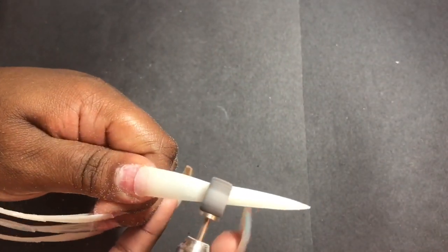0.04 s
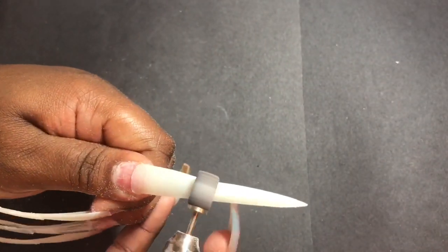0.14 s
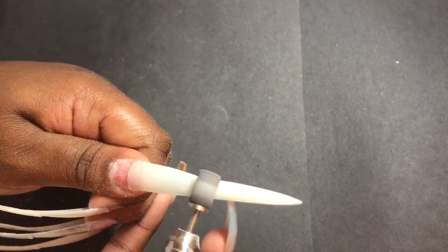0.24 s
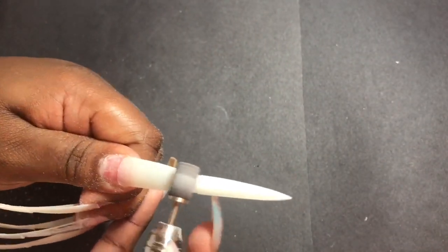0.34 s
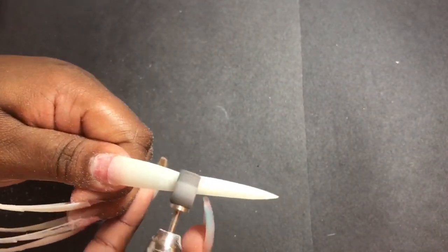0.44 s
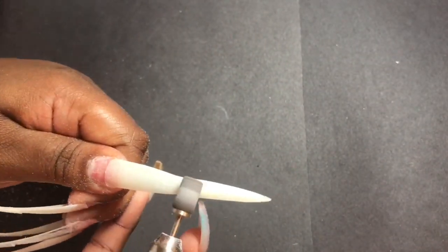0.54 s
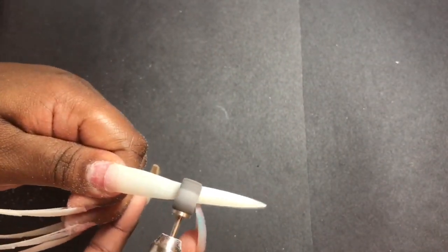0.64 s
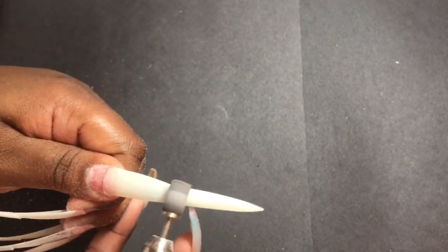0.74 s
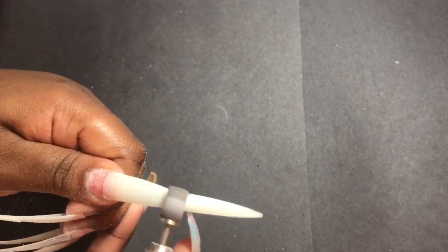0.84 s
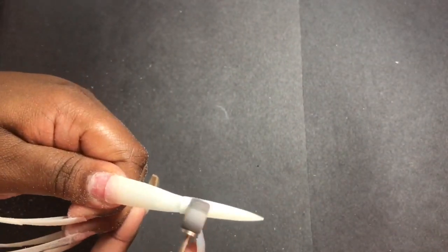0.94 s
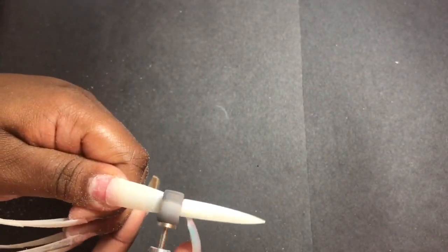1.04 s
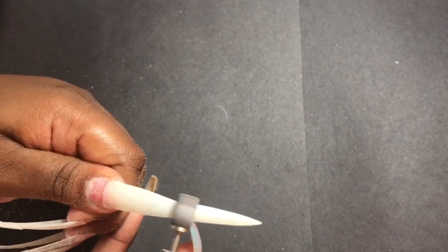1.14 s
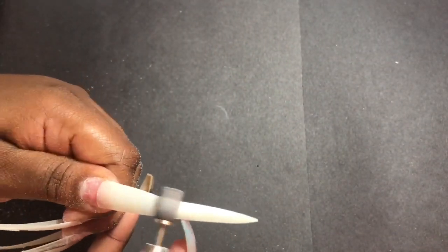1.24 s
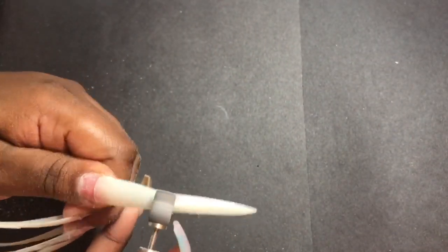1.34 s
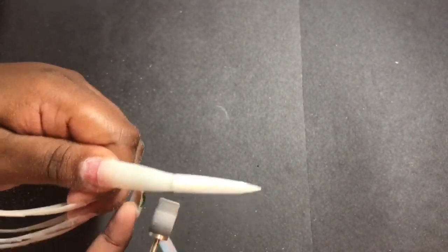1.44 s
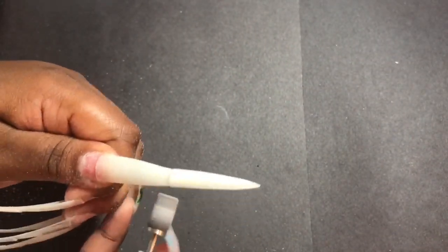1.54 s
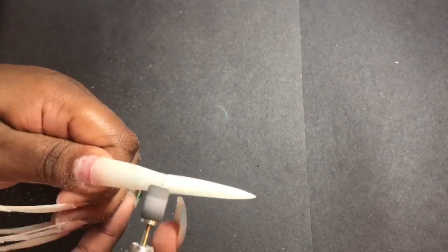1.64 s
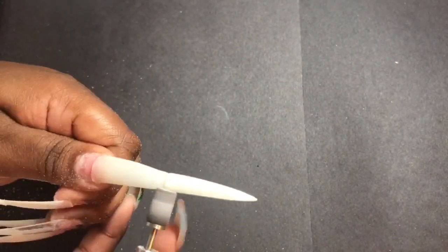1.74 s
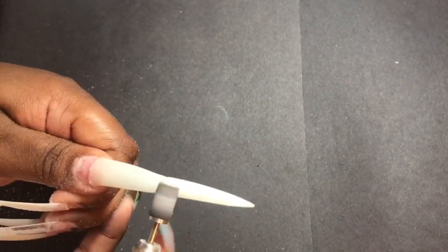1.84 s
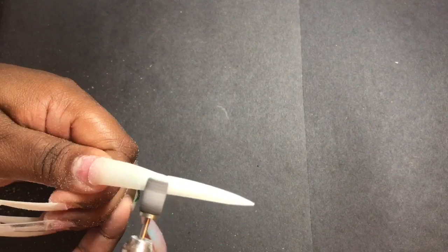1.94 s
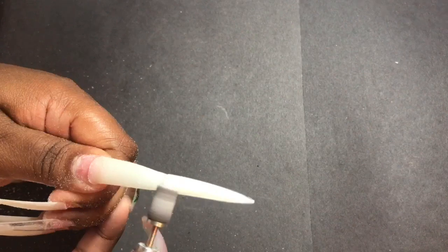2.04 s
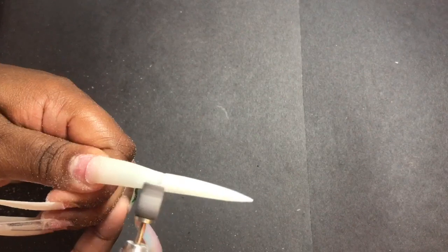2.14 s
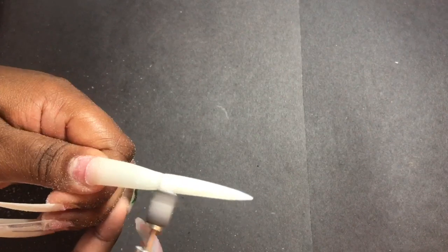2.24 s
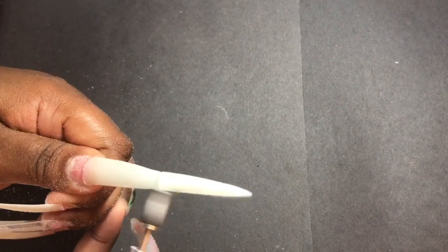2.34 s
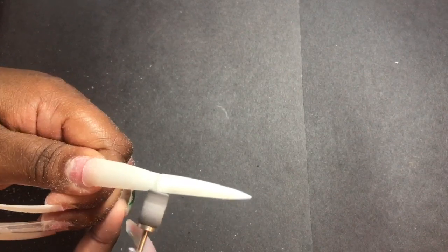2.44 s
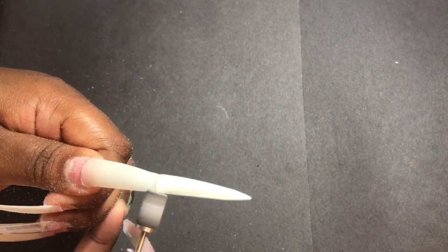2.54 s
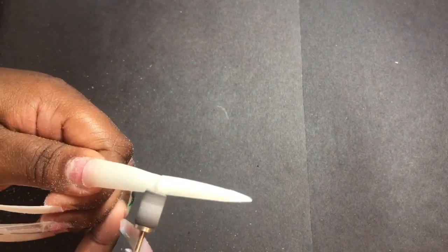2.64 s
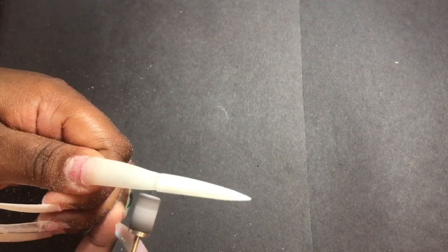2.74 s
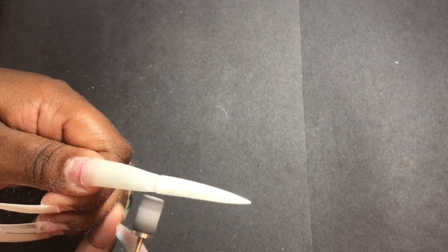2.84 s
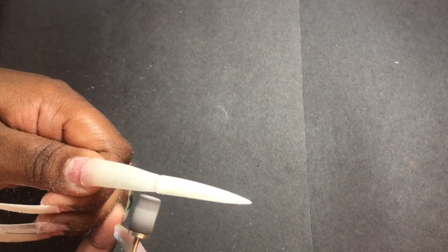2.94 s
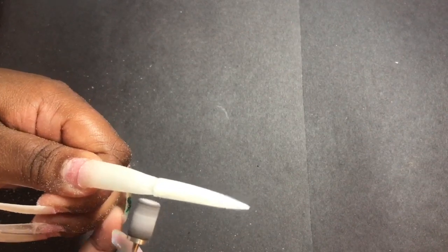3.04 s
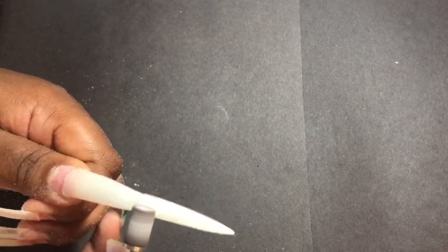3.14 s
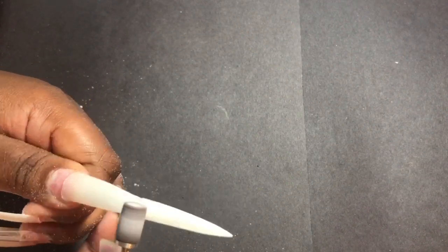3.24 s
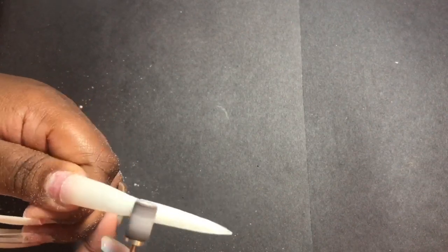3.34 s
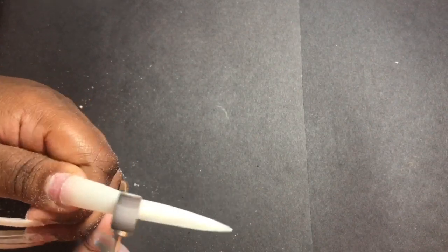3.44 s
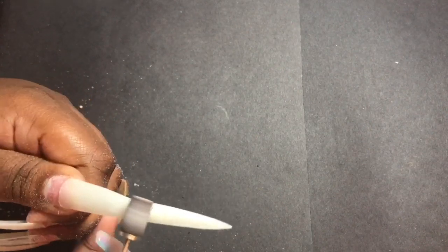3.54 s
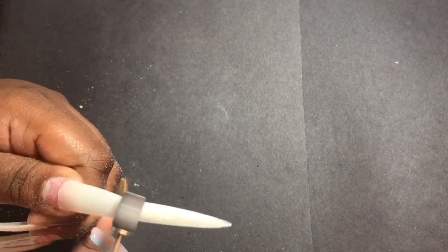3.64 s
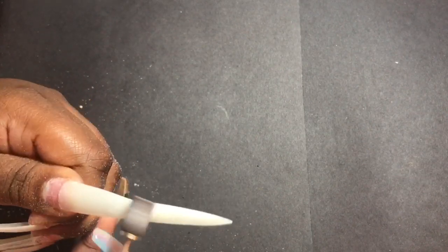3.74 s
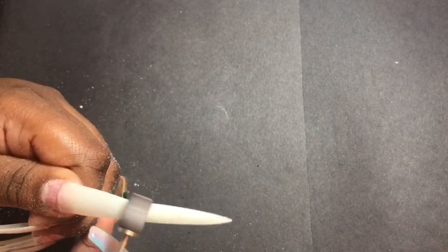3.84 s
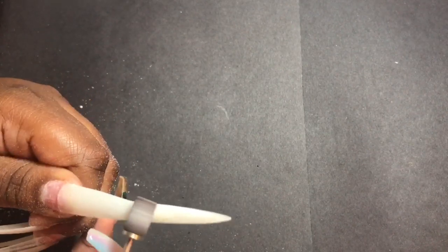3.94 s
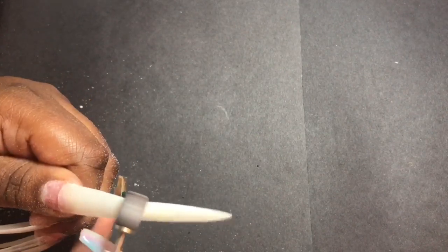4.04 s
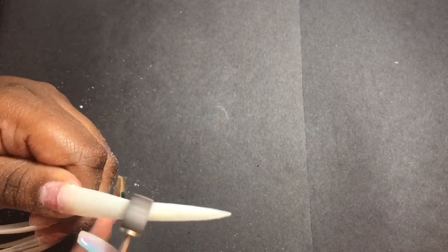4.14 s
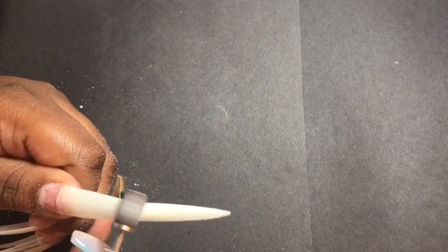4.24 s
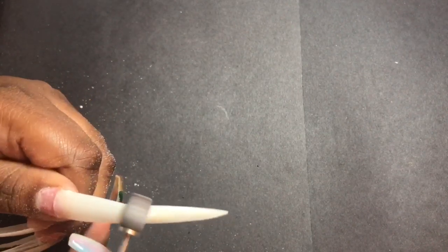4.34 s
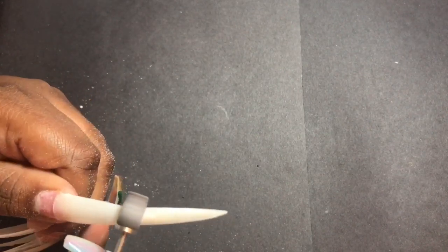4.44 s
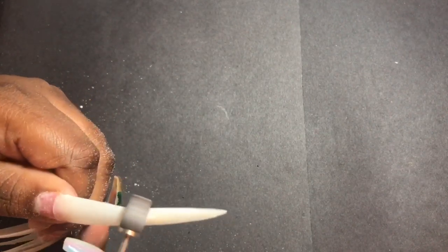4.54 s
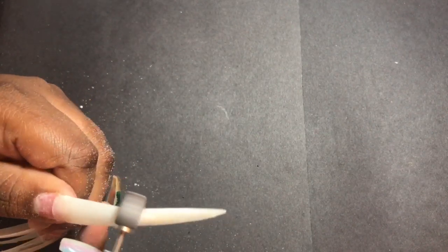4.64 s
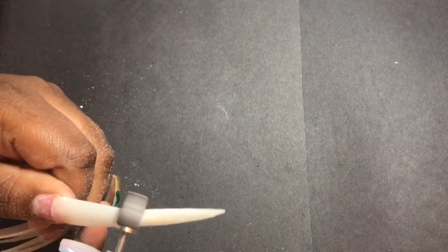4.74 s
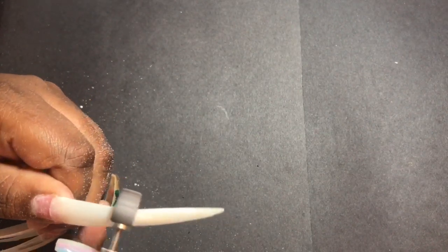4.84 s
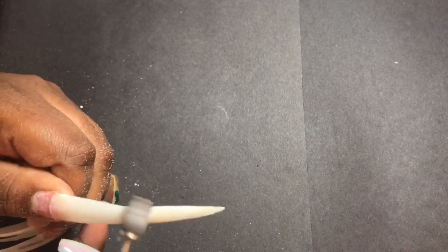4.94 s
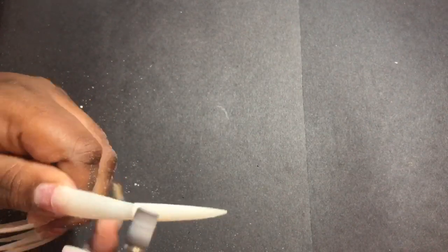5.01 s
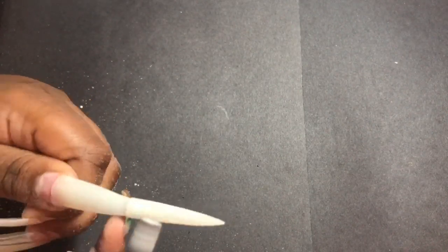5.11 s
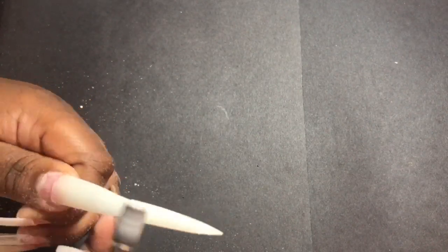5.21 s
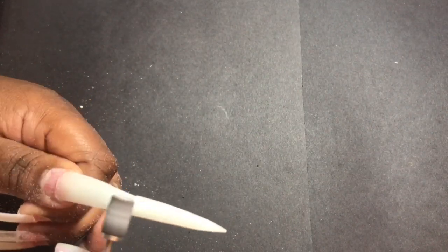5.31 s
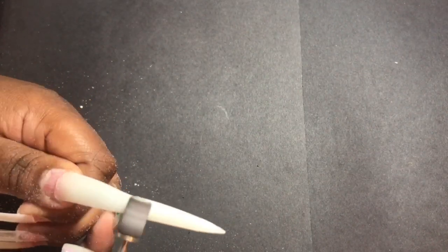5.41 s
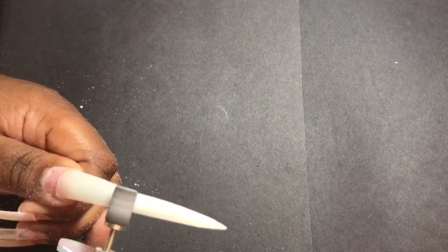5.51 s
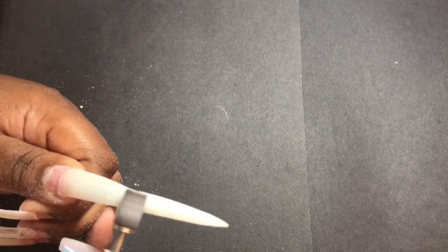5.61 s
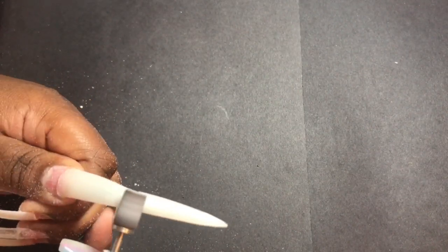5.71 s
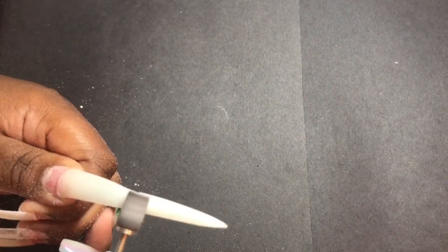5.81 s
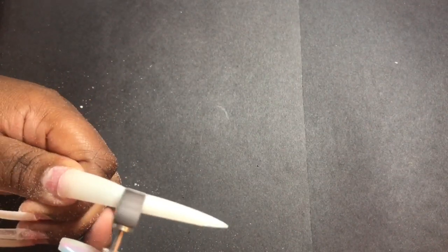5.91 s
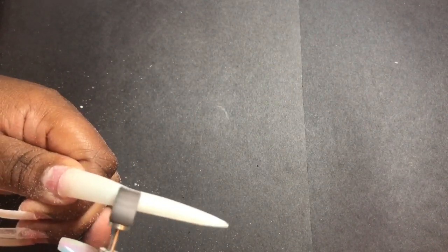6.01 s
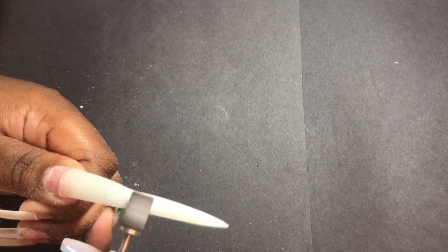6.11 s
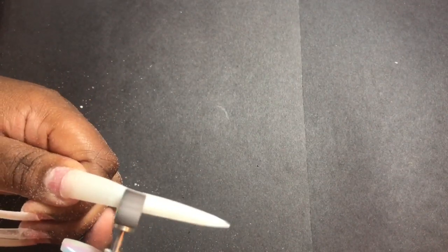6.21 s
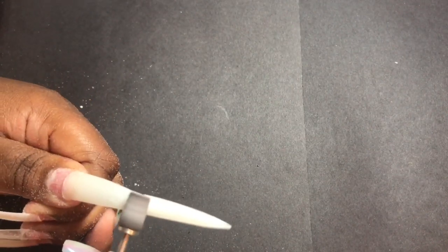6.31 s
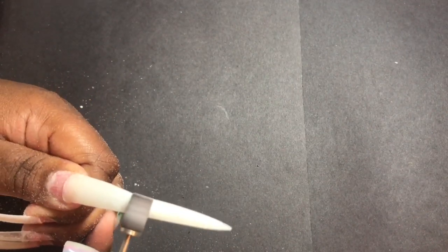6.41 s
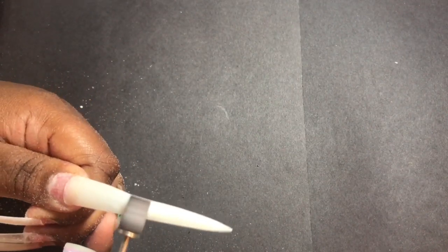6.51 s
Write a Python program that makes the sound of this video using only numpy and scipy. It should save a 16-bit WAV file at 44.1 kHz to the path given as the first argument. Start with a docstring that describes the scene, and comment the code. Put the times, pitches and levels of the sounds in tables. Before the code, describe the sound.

A spinning sanding band makes a plastic nail ring with a harsh, gritty, nasal buzz, stuttering when it touches lightly and growing fuller and slightly lower under pressure. Between strokes only the handpiece's thin steady hiss remains, over a faint low room rumble. Early on, shifting hands give soft hollow thumps on the table. The microphone is very near, with only slight room reflections.

```python
"""Quick grazes and a short touch begin the sound: an electric nail drill sands a plastic nail tip, close by.
Longer strokes follow, up to the end: grit on the spinning band rings the nail, a light touch chatters
twice a turn, and drag slows the motor. Between strokes the steady hiss of the handpiece is heard.
From about 1.5 to 2.7 s dull bumps ring the table as the hands shift, with one hollow rub near 2.4 s.
Low room rumble runs throughout, and faint reflections follow the sanding."""
import sys
import numpy as np
from scipy import signal
from scipy.fft import rfft, irfft
from scipy.io import wavfile
from scipy.ndimage import uniform_filter1d

SR = 44100
rng = np.random.default_rng(int(sys.argv[2]) if len(sys.argv) > 2 else 0)


def master(y):
    """Save y as 16-bit WAV."""
    cut = np.clip(np.atleast_2d(y).T, -1, 1)
    pcm = np.round(cut * 32767)  # scale
    wavfile.write(sys.argv[1], SR, pcm.astype(np.int16))


N = 289428
TIME = np.arange(N) / SR
BINS = np.maximum(np.fft.rfftfreq(2048, 1 / SR), 1)  # frequencies for the small bodies [Hz]

# Strokes of the band on the nail: (touch [s], lift [s], attack [s], release [s], relative level [dB],
#   level change [dB/s], low scrape against ring [dB], hiss against ring [dB],
#   extra chatter at the touch [dB], drag at the touch [Hz], drag at the lift [Hz])
STROKES = [ (0.146, 0.214, 0.018, 0.034, -28.5, 8, -10.5, -2.5, 28, 41, 1.26),
           (0.217, 0.482, 0.057, 0.045, -24, -9.5, -9.1, -2, 21.5, 11.5, 6.5),
           (0.605, 1.486, 0.170, 0.057, -26.5, -1.2, -7.5, -1.1, 21, 5.5, 34),
           (1.726, 1.759, 0.0044, 0.0099, -29, 0, -8, -0.5, 15, -0.5, 0),
           (1.906, 2.757, 0.070, 0.015, -26.5, -18, -6.8, 0.6, 3, 19, 6),
           (3.413, 5.058, 0.035, 0.059, -26.1, -3, -7, -0.5, 3, 13, 21),
           (5.499, 6.600, 0.047, 0.022, -26.5, -1.5, -8.5, -2, 7, 12.5, 34), ]
# Nail resonances at different places of contact: (centre [Hz], width [Hz], relative level [dB])
SKIM_MODES = [(760, 1000, -10), (1710, 670, -5.5), (2310, 480, 3), (3740, 750, 2.5), (5420, 1900, -13),
              (6340, 330, -7), (7630, 960, -5), (9500, 2300, -17), (11050, 620, -11), (12500, 1600, -21),
              (15400, 1900, -38)]
LEAN_MODES = [(808, 330, -5), (1740, 340, -5), (2330, 550, -2.5), (3630, 530, 4), (5440, 830, -1.5),
              (6570, 620, -10), (7740, 900, -12), (9850, 830, -7.5), (10900, 800, -11), (12500, 1500, -16),
              (15000, 2000, -19)]
PRESS_MODES = [(1060, 770, -5.5), (1700, 340, -6), (2440, 600, 1.5), (3560, 780, -9), (4250, 750, -3),
               (6040, 380, -0.5), (7520, 1200, -3.5), (9400, 1000, -5), (11020, 750, -9.5),
               (12800, 2300, -15.5), (14700, 2500, -27)]
EDGE_MODES = [(843, 1100, -7.5), (1663, 300, -3.5), (2400, 360, 6.5), (3930, 1030, 1.5), (5890, 560, -5),
              (7213, 640, -2), (8770, 1000, -8.5), (10030, 750, -9.5), (11360, 480, -9.5),
              (12850, 800, -15), (14900, 1500, -20)]
UNDER_MODES = [(776, 400, -6.5), (1594, 390, -2.5), (2374, 610, 0), (3230, 740, -8), (4080, 1600, -5),
               (5870, 950, -1.5), (7100, 700, 0), (8650, 840, -4), (9860, 800, -2.5), (11330, 540, -4.5),
               (12900, 700, -8), (14500, 1300, -11)]
BLEND_MODES = [(1036, 740, -8.5), (1620, 470, -7.5), (2322, 484, 2), (3780, 850, -2.5), (5844, 316, -4),
               (7110, 2700, -10.5), (8100, 350, -10), (9120, 1300, -13.5), (11080, 420, -10.5),
               (13100, 890, -19.5), (14800, 2000, -30)]
BASE_MODES = [(754.4, 380, -10), (1389, 1290, -11), (2430, 363, 4), (3850, 1170, -2.5), (5940, 810, -3),
              (7250, 850, -4), (8480, 570, -3), (9480, 1400, -11.5), (11100, 1100, -14.5),
              (12350, 1800, -11), (14900, 1280, -18)]
# Where the band sits on the nail: (from [s], resonances as above)
PLACES = [(0, SKIM_MODES), (.385, LEAN_MODES), (.5, SKIM_MODES), (.57, PRESS_MODES), (1.6, EDGE_MODES),
          (2.13, UNDER_MODES), (3, BLEND_MODES), (4.25, BASE_MODES), (5.3, BLEND_MODES)]
# Firmer pressure within the strokes, or lighter where the level is negative:
#   (middle [s], length [s], rise of the ring [dB], share of it that the hiss follows, extra drag [Hz])
PRESSES = [(0.29, 0.06, 2, 0.82, 0), (0.41, 0.04, 2.5, 0.55, 4), (0.632, 0.059, 3.5, 0, 0),
           (0.84, 0.065, 4, 0.29, 4), (0.952, 0.095, 5, 0.26, 8), (1.11, 0.03, 6, 0.47, 10),
           (1.2, 0.082, 5.5, 0.6, 2), (1.343, 0.023, 5, 0.81, 6), (1.416, 0.019, 5, 0.43, 0),
           (1.929, 0.054, 5.5, 0.16, 0), (2.08, 0.105, 8.5, 0.49, 3), (2.239, 0.04, 8, 0.39, 6),
           (2.303, 0.069, 9, 0.71, 11), (2.398, 0.087, -1, 1.1, 0), (2.495, 0.11, 5, 0.75, 1),
           (2.704, 0.092, 4.5, 0.04, 6), (3.537, 0.04, 6, 0.3, 14), (3.603, 0.048, 5.5, 0.17, 9),
           (3.797, 0.11, 5, 0.41, 10), (3.886, 0.037, -3.5, 0.43, 0), (3.953, 0.08, 3, 0.022, 0),
           (4.028, 0.08, 2.8, 0.23, 0), (4.151, 0.032, 7.5, 0.3, 0), (4.222, 0.064, 5.5, 0.41, 1),
           (4.341, 0.041, 5.5, 0.59, 11), (4.375, 0.027, -5, 0, 0), (4.417, 0.06, 7.5, 0.71, 6),
           (4.627, 0.05, 4.5, 0.22, 0.5), (4.7, 0.058, -2, 0.14, 0), (4.85, 0.1, 4.5, 0.51, 16),
           (5.017, 0.037, 6.5, 0.32, 24), (5.658, 0.12, 5.5, 0.48, 1), (6.039, 0.037, 6.5, 0.41, 22.5),
           (6.12, 0.095, 6, 0.31, 8), (6.225, 0.1, -3, 0.37, 0), (6.365, 0.16, 6, 0.26, 0),
           (6.537, 0.07, 5, 0.3, -1.5)]
# Single grazes of the band: (time [s], relative peak level [dB])
GRAZES = [(0.001, -18.5), (0.008, -23.5), (0.052, -31), (0.519, -22), (0.523, -28.5), (0.529, -23.5),
          (2.741, -23)]
# Resonances of the handpiece housing: (centre [Hz], width [Hz], relative level [dB])
HANDPIECE = [(870, 1500, -8), (1990, 170, -3.5), (2660, 600, -8), (4240, 3100, -23.5), (6300, 800, -28),
             (7600, 1800, 5.5), (9500, 1600, -2.5), (13400, 660, -3)]
# Bearing whistle as the spindle runs free again: (start [s], length [s], level [dB])
WHISTLES = [(1.454, 0.28, -50.5), (1.83, 0.07, -52), (2.98, 0.08, -52.5)]
# Hum of the loaded motor: (multiple of the spindle speed, relative level [dB])
HUM = [(2, -76.5), (3, -69.5), (4, -74.5)]
# Faint whine of the rotor: (multiple of the spindle speed, relative level [dB])
WHINE = [(20, -79.5), (26, -75)]
# Dull bumps, each a quick run of blows: (time [s], number of blows, gap [s],
#   relative boom level [dB], relative knock level [dB], change per blow [dB])
BUMPS = [ (1.467, 1, 0.019, -46, -55, 0), (1.563, 1, 0.022, -61, -44, 0),
         (1.608, 2, 0.021, -46, -37.5, -7.5), (1.704, 4, 0.026, -40, -42.5, 0.5),
         (1.830, 3, 0.030, -37, -34, -3), (2.003, 4, 0.018, -34.5, -37, -2),
         (2.128, 3, 0.0183, -43, -28, -3.5), (2.344, 4, 0.026, -47.5, -42, 1.5),
         (2.681, 1, 0.019, -45, -43.5, 0), ]
# Short table modes above the boom: (pitch [Hz], relative level [dB], time to fall by 60 dB [s])
TABLE_MODES = [(243, -3.5, 0.16), (284, 0.5, 0.11), (325, 7.5, 0.045), (391, 0.5, 0.05)]
# Colour of the room's rumble: (frequency [Hz], relative level [dB])
ROOM = [(15, -54), (25, -20.5), (65, 1.5), (97, -12.5), (147, -8), (179, -20.5), (237, -11.5), (289, -15),
        (392, -23.5), (425, -16.5), (600, -32), (780, -66), (1320, -120)]

TREMOR_DB, TREMOR_PER_S = 0.75, 35  # unsteadiness of the hand
PRESS_EDGE_S = 0.02  # time that a press takes to build, and to let go
SCRAPE_SHARE = 0.75  # how much of the hiss's rise the low scrape follows
LANDING_S, LANDING_GAIN = 0.01, 0.33  # the grit bites at once, to part of its full strength
# The band bounces as it lands and before it lifts; between, a slight flutter remains.
SETTLE_S, LEAVING_S, FLUTTER_DB = 0.2, 0.048, 2.5
HOLD_DOWN_DB = 2.6  # a press shrinks the bounce depth by this many dB per dB of pressure
FREE_HZ, INERTIA_S = 103.2, 0.15  # free spindle speed, and how slowly it follows the drag
RUB_S, RUB_ATTACK_S, RUB_DECAY_S, RUB_DB = 2.395, 0.036, 0.05, -33
BOOM_HZ, BOOM_T60_S = 145.4, 0.38
ROOM_DB = -59.5
TOP_HZ = 15750


def sanding(turns, tone_gain, scrape_gain, hiss_gain, chatter_db):
    """Pressure sets the balance: a firm touch brings out the ring, a light one leaves scrape and hiss."""
    sound = nail(scraping(turns, chatter_db))
    scrape = band(sound, 60, 1950)
    hiss = band(sound, 5100, 20000)
    tone = sound - scrape - hiss

    def steady(x):
        """Even out the level, so that the gains alone shape the strokes."""
        return x / running_rms(x, .05)

    return (steady(tone) * tone_gain * undb(-1.23)
            + steady(scrape) * scrape_gain * undb(-0.2)
            + steady(hiss) * hiss_gain * undb(-0.15))


def scraping(turns, depth_db):
    """Force on the nail: grit, let through by the two high spots of a slightly oval band."""
    # The high spots are not quite opposite, and one stands prouder.
    since_spot = (2 * turns + .06 * np.cos(2 * np.pi * turns)) % 1
    lift = 1 - np.exp(-(since_spot / 0.51) ** 2)
    grip = undb(-depth_db * lift + 0.98 * np.sin(2 * np.pi * turns))
    cutting = grit(turns, count=110, memory=0.914, spread_db=1.0, jitter_s=.00003)
    chips = grit(turns, count=40, memory=0.13, spread_db=3.5, jitter_s=.0003)
    return (cutting + undb(-5.5) * chips) * grip * undb(0.83 * wander(90))


def grit(turns, count, memory, spread_db, jitter_s):
    """Grains round a spinning rim strike once a turn; memory near 1 makes their bite change slowly."""
    laps = int(turns[-1]) + 1
    angle = (np.arange(count) + rng.random(count)) / count
    chance = rng.standard_normal((2, laps, count))
    bite, size = signal.lfilter([np.sqrt(1 - memory ** 2)], [1, -memory], chance, axis=1)
    # Turn each grain's angle into a time; -1 marks strikes after the end.
    when = np.interp(np.arange(laps)[:, None] + angle, turns, TIME, right=-1)
    place = SR * (when + jitter_s * rng.standard_normal((laps, count)))
    heard = (place > 0) & (place < N - 1)
    strength = bite * undb(spread_db * np.minimum(size, 2))
    return unit(np.bincount(np.round(place[heard]).astype(int), strength[heard], N))


def nail(force):
    """The nail rings; as the band rocks, each resonance drifts in pitch and swells by itself."""
    hop = SR // 40
    starts = np.arange(0, N, hop)
    force = np.pad(force, (0, 2 * hop))
    chance = rng.standard_normal((2, len(starts), 12))
    drift, swelling = unit(uniform_filter1d(chance, size=4, axis=1))
    out = np.zeros(len(force) + 2 * len(BINS))
    # Overlapping short pieces fade into one another, each with its own resonances.
    for start, detune, swell_db in zip(starts, .012 * drift, 1.7 * swelling):
        modes = [m for s, m in PLACES if s <= (start + hop) / SR][-1]
        moved = [(hz * (1 + d), width, db + e)
                 for (hz, width, db), d, e in zip(modes, detune, swell_db)]
        piece = force[start:start + 2 * hop] * np.hanning(2 * hop)
        rung = signal.fftconvolve(piece, body(moved, low_hz=620, valley_db=-26, leak_db=-14))
        out[start:start + len(rung)] += rung
    return out[:N]


def body(modes, low_hz, valley_db, leak_db):
    """Response of a small body: resonances over a weak broad response, with little sound below low_hz."""
    power = sum(undb(db) ** 2 / (1 + (2 * (BINS - hz) / width) ** 2) ** 2 for hz, width, db in modes)
    radiation = 1 / np.sqrt(1 + (low_hz / BINS) ** 12)
    leak = undb(leak_db) * BINS / (BINS + low_hz)
    gain = np.sqrt(power + undb(valley_db) ** 2) * (radiation + leak)
    # Minimum phase: the body starts to sound as soon as it is struck.
    cepstrum = irfft(np.log(gain))
    half = len(cepstrum) // 2
    folded = np.r_[cepstrum[0], 2 * cepstrum[1:half]]
    return irfft(np.exp(rfft(folded, 2 * half)))


def contact(press_db, press_hiss_db):
    """Strokes and pressure set the gains of ring, scrape and hiss, and the chatter depth in dB."""
    tone, scrape, hiss, bounce_db = np.zeros((4, N))
    for touch, lift, attack, release, db, fade, scrape_db, hiss_db, chatter_db, *_ in STROKES:
        age = np.clip(TIME - touch, 0, lift - touch)
        gain = swell(touch, lift, attack, release) * undb(db + fade * age)
        tone = tone + gain
        scrape = scrape + gain * undb(scrape_db)
        hiss = hiss + gain * undb(hiss_db)
        landing = np.exp(-age / SETTLE_S)
        leaving = np.exp((touch + age - lift) / LEAVING_S)
        bounce_db = np.where(TIME >= touch, chatter_db * np.maximum(landing, leaving), bounce_db)

    def unsteady(db):
        """Gain with the tremor of the hand."""
        return undb(db + TREMOR_DB * wander(TREMOR_PER_S))

    held_down = undb(-HOLD_DOWN_DB * np.maximum(press_db, 0))
    return (tone * unsteady(press_db),
            scrape * unsteady(SCRAPE_SHARE * press_hiss_db),
            hiss * unsteady(press_hiss_db),
            FLUTTER_DB + bounce_db * held_down)


def pressing():
    """Each press builds, holds and lets go: changes of ring and hiss in dB, and drag in Hz."""
    ring_db, hiss_db, drag_hz = np.zeros((3, N))
    for middle, length, db, share, hz in PRESSES:
        plateau = np.clip((length / 2 - np.abs(TIME - middle)) / PRESS_EDGE_S + .5, 0, 1)
        ring_db += db * plateau
        hiss_db += share * db * plateau
        drag_hz += hz * plateau
    return ring_db, hiss_db, drag_hz


def spindle(drag_hz):
    """Turns made so far: drag from strokes and presses slows the motor, which recovers when lifted."""
    for touch, lift, attack, release, *_, first_hz, last_hz in STROKES:
        stroke_hz = np.interp(TIME, [touch, lift], [first_hz, last_hz])
        drag_hz = drag_hz + swell(touch, lift, attack, release) * stroke_hz
    keep = np.exp(-1 / (INERTIA_S * SR))
    speed_hz = FREE_HZ - signal.lfilter([1 - keep], [1, -keep], drag_hz)
    unevenness = 1 + .006 * wander(20) * touching()
    return np.cumsum(speed_hz * unevenness) / SR


def touching():
    """1 while the band is on the nail, otherwise 0."""
    on_nail = sum(1. * ((TIME >= touch) & (TIME <= lift)) for touch, lift, *_ in STROKES)
    return np.minimum(on_nail, 1)


def swell(start, end, attack, release):
    """A quick landing, then rise, hold and fall."""
    age = TIME - start
    growth = LANDING_GAIN + (1 - LANDING_GAIN) * np.clip(age / attack, 0, 1)
    rise = np.clip(age / LANDING_S, 0, 1) * growth
    return rise * np.clip((end - TIME) / release, 0, 1)


def grazes():
    """A high spot just catches the nail: about a millisecond of grit makes it ring."""
    out, age = np.zeros(N), TIME[:SR // 20]
    response = body(SKIM_MODES, low_hz=590, valley_db=-23.5, leak_db=8)
    for s, db in GRAZES:
        burst = rng.standard_normal(len(age)) * np.exp(-age / 0.0013)
        tick = ring(burst, response)
        start = int(s * SR)
        out[start:start + len(age)] += tick / np.abs(tick).max() * undb(db + 6.0)
    return out


def handpiece(turns):
    """Brushes and bearings hiss through the housing, partly alike each turn; a bearing whistles at times."""
    friction = grit(turns, count=160, memory=0.46, spread_db=3.0, jitter_s=.00002)
    housing = body(HANDPIECE, low_hz=200, valley_db=-13.5, leak_db=-27)
    hiss = unit(ring(friction, housing)) * undb(-50.0 + 0.47 * wander(11))
    bearing = body([(6230, 230, 0)], low_hz=1979, valley_db=-45, leak_db=-8)
    whistle = unit(ring(friction, bearing))
    whistle_gain = sum(undb(db) * swell(s, s + length, attack=.025, release=0.035)
                       for s, length, db in WHISTLES)
    return hiss + whistle * whistle_gain


def motor(turns, load):
    """Tones at multiples of the spindle speed: a hum that grows with the load, and a faint whine."""
    def orders(table):
        """Sines locked to the turning, each with a wandering level."""
        return sum(np.sqrt(2) * undb(db + 4.4 * wander(12)) * np.sin(2 * np.pi * multiple * turns)
                   for multiple, db in table)

    smooth_load = unit(uniform_filter1d(load, size=2000))
    return smooth_load * orders(HUM) + orders(WHINE)


def bumps():
    """Soft blows ring the table's low boom and a few short modes above it, each slightly differently."""
    age = TIME[:SR // 2]
    soft = 1 - np.exp(-(age / 0.004) ** 2)

    def mode(hz, t60):
        """One softly struck, dying tone."""
        return soft * np.sin(2 * np.pi * hz * age) * np.exp(-np.log(1000) * age / t60)

    out = np.zeros(N)
    for s, blows, gap, boom_db, knock_db, change_db in BUMPS:
        for k in range(blows):
            detune = 1 + 0.031 * rng.standard_normal(len(TABLE_MODES) + 1)
            knock = sum(undb(db) * mode(hz * d, t60) for (hz, db, t60), d in zip(TABLE_MODES, detune))
            boom = mode(BOOM_HZ * detune[-1], BOOM_T60_S)
            blow = undb(boom_db) * boom + undb(knock_db) * knock
            start = int((s + k * gap) * SR)
            out[start:start + len(age)] += undb(k * change_db) * blow
    return band(out, lo_hz=107, hi_hz=507)


def hollow_rub():
    """As the hands shift, uneven friction sounds through a hollow resonance, swells and dies away."""
    friction = rng.standard_normal(N) * undb(2.15 * wander(130))
    age = np.maximum(TIME - RUB_S, 0)
    fall = np.exp(-np.maximum(age - RUB_ATTACK_S, 0) / RUB_DECAY_S)
    envelope = np.minimum(age / RUB_ATTACK_S, 1) * fall
    hollow = body([(710, 380, 0)], low_hz=448, valley_db=-41, leak_db=-9)
    return unit(ring(friction, hollow)) * envelope * undb(RUB_DB)


def reflections(x, t60, wet_db, near_db):
    """Scatter off the hands and table top, then the faint, short tail of a furnished room."""
    age = TIME[:SR // 2]
    near = rng.standard_normal(len(age)) * (age > .0008) * np.exp(-age / 0.0041)
    tail = band(rng.standard_normal(len(age)), 180, 6600)
    tail = tail * (age > .004) * np.exp(-np.log(1000) * age / t60)
    near_part = undb(near_db) * near / np.linalg.norm(near)
    tail_part = undb(wet_db) * tail / np.linalg.norm(tail)
    return ring(x, near_part + tail_part)


def room_tone():
    """Low rumble of the room: random noise, coloured by frequency."""
    hz, db = np.transpose(ROOM)
    bins = np.maximum(np.fft.rfftfreq(N, 1 / SR), 1)
    gain = undb(np.interp(np.log(bins), np.log(hz), db))
    rumble = irfft(rfft(rng.standard_normal(N)) * gain, N)
    return unit(rumble) * undb(ROOM_DB)


def undb(db):
    """Decibels to gain."""
    return 10 ** (np.asarray(db) / 20)


def unit(x):
    """Scale to an average (rms) level of 1."""
    return x / np.sqrt(np.mean(x ** 2))


def running_rms(x, seconds):
    """Level over a sliding window."""
    return np.sqrt(np.maximum(uniform_filter1d(x ** 2, int(seconds * SR)), 1e-12))


def band(x, lo_hz, hi_hz):
    """Keep one band of frequencies, without delay."""
    sos = signal.butter(3, [lo_hz, min(hi_hz, SR / 2 - 1)], "band", fs=SR, output="sos")
    return signal.sosfiltfilt(sos, np.pad(x, SR // 10))[SR // 10:][:len(x)]


def ring(x, response):
    """Play a signal through an impulse response."""
    return signal.oaconvolve(x, response)[:len(x)]


def wander(rate):
    """Smooth random drift with an rms of 1, drawn anew about rate times a second."""
    count = int(SR / rate)
    steps = np.repeat(rng.standard_normal(N // count + 1), count)
    return unit(uniform_filter1d(steps, count)[:N])


def scene():
    """The hand's pressure sets the sanding and slows the spindle, which also drives the handpiece's noise."""
    press_db, press_hiss_db, drag_hz = pressing()
    turns = spindle(drag_hz)
    tone, scrape, hiss, chatter_db = contact(press_db, press_hiss_db)
    work = sanding(turns, tone, scrape, hiss, chatter_db) + grazes()
    machine = handpiece(turns) + motor(turns, tone)
    room = reflections(work, t60=0.26, wet_db=-20.5, near_db=-15.5) + room_tone()
    return (work + machine + bumps() + hollow_rub() + room)[None]


def record(dry):
    """The recorder cuts the top with a steep low-pass filter."""
    sos = signal.ellip(12, .2, 80, TOP_HZ, fs=SR, output="sos")
    return signal.sosfilt(sos, dry)


dry = scene()
out = record(dry)
master(out)
```